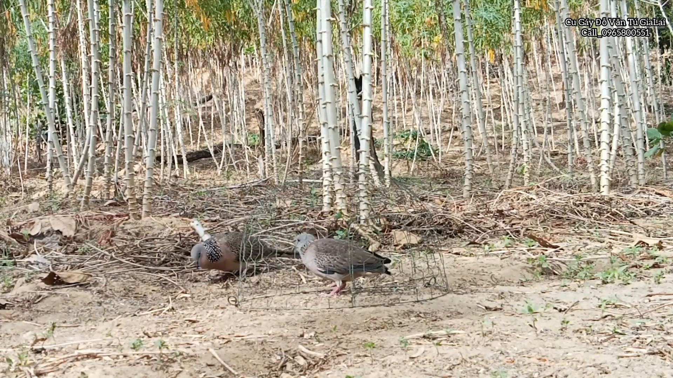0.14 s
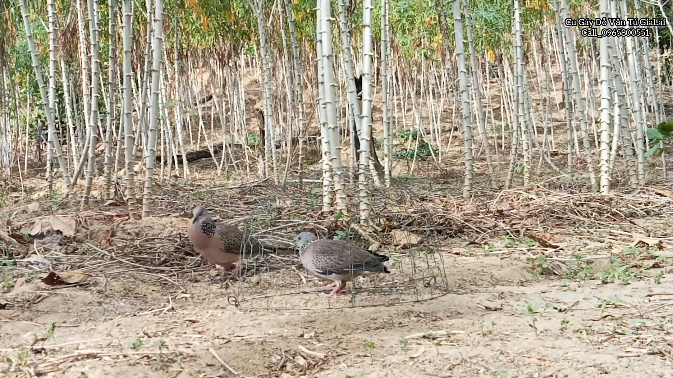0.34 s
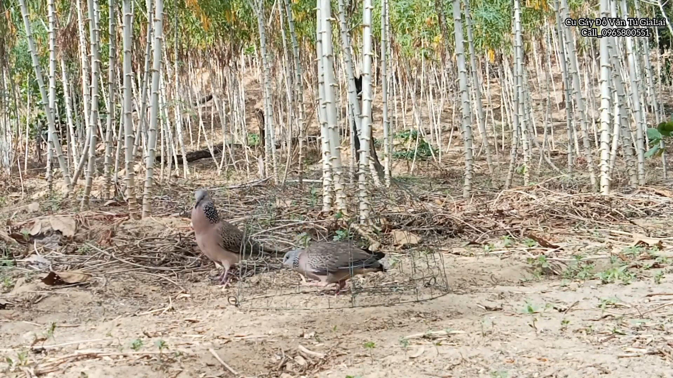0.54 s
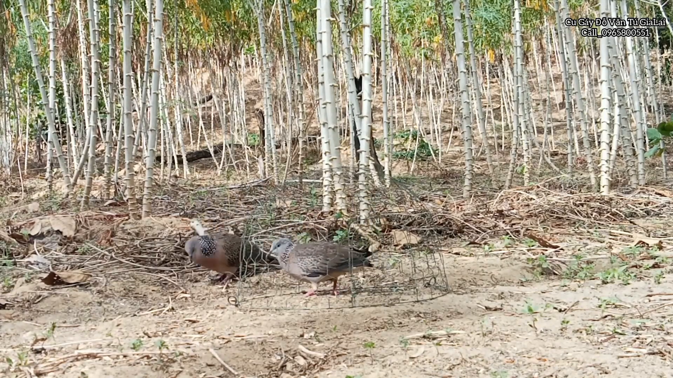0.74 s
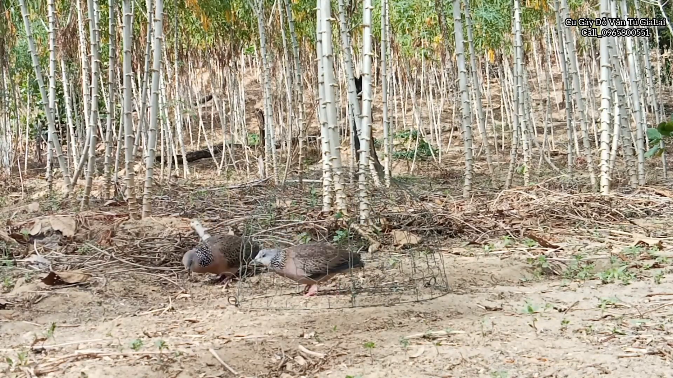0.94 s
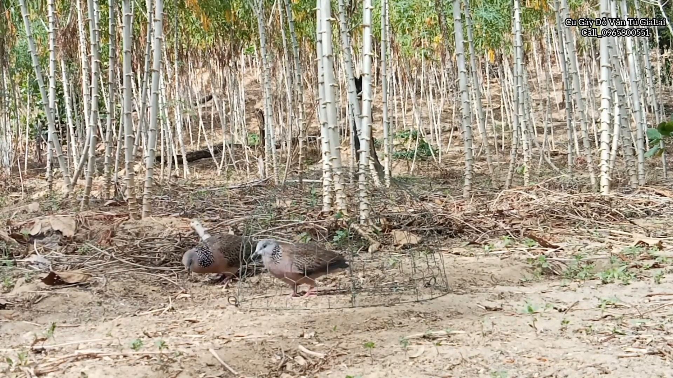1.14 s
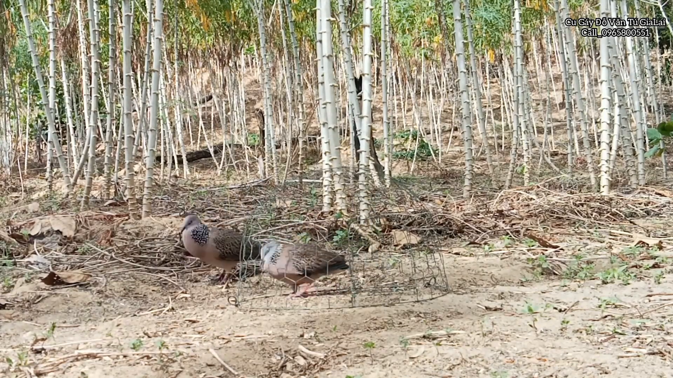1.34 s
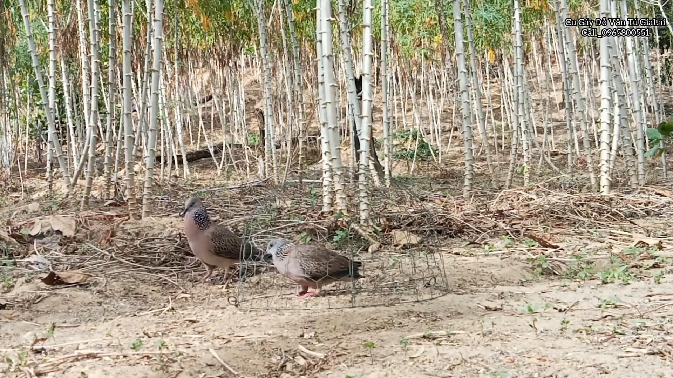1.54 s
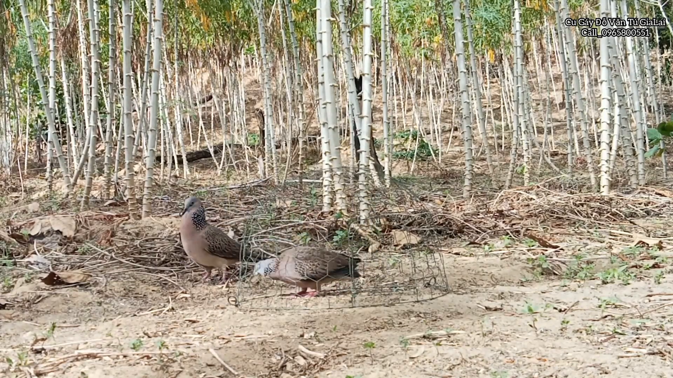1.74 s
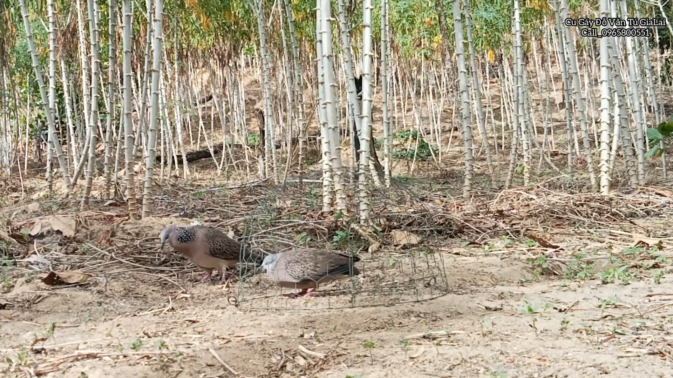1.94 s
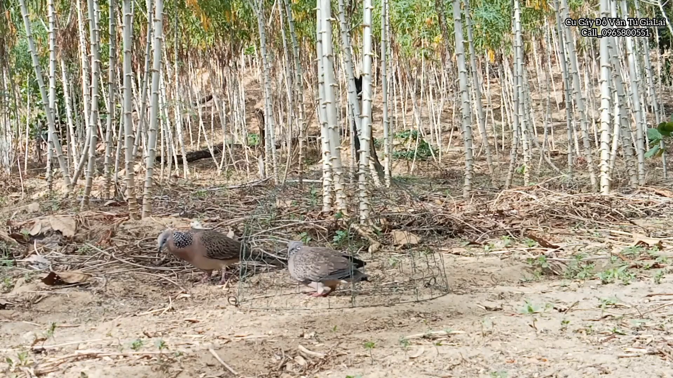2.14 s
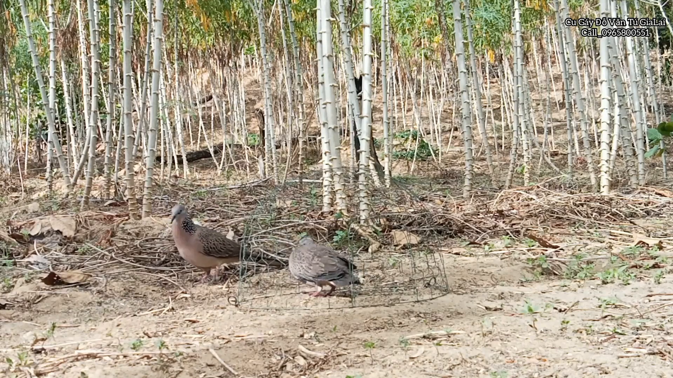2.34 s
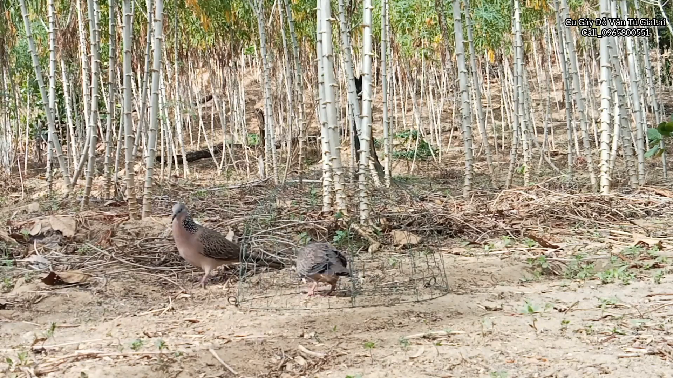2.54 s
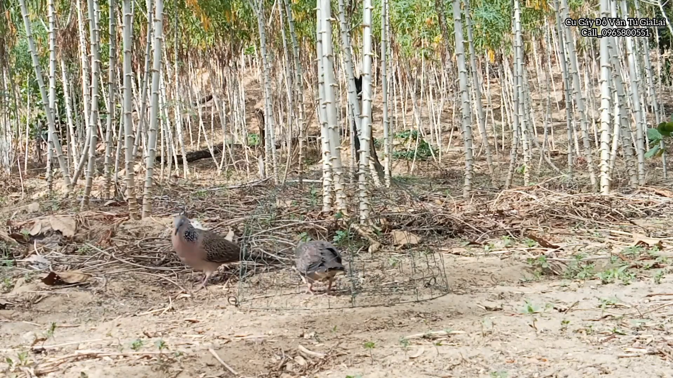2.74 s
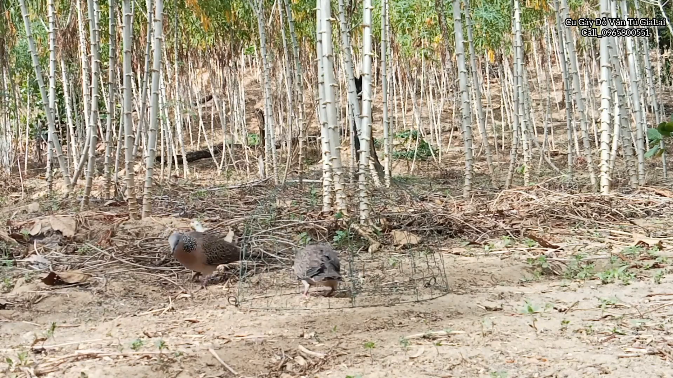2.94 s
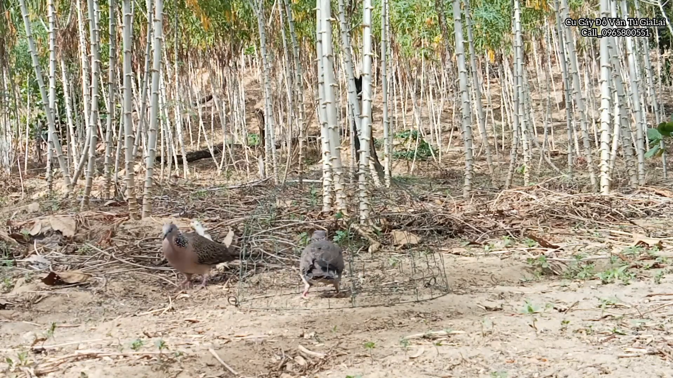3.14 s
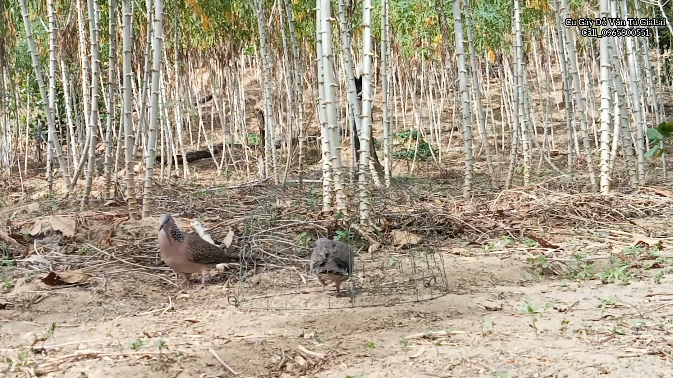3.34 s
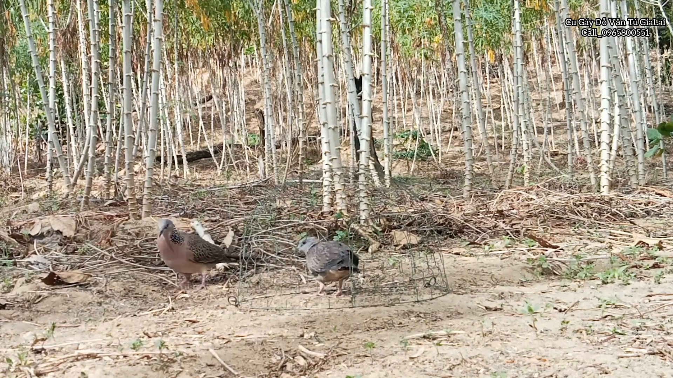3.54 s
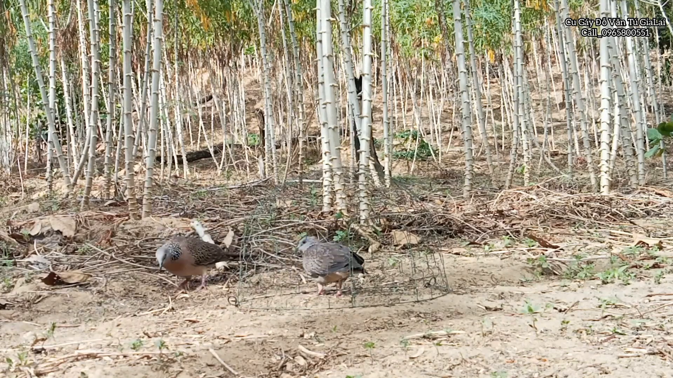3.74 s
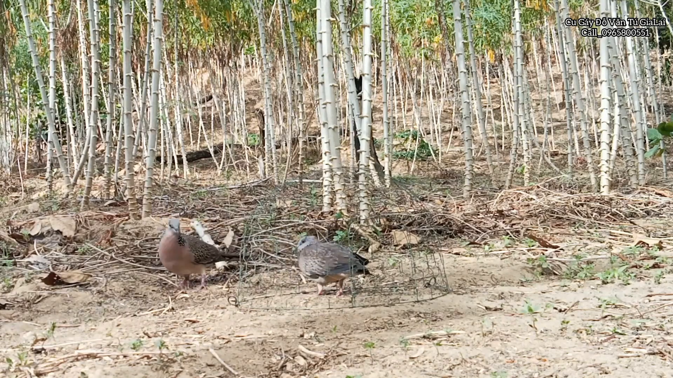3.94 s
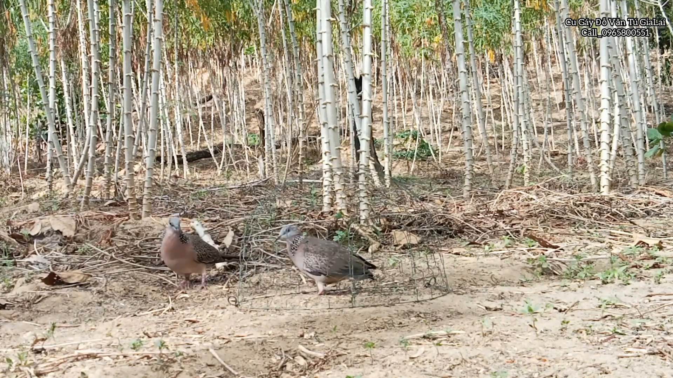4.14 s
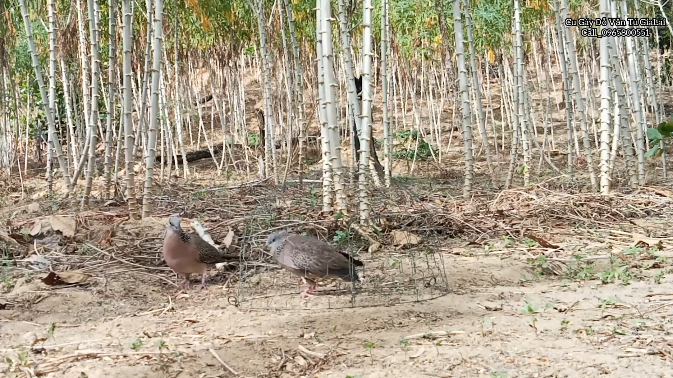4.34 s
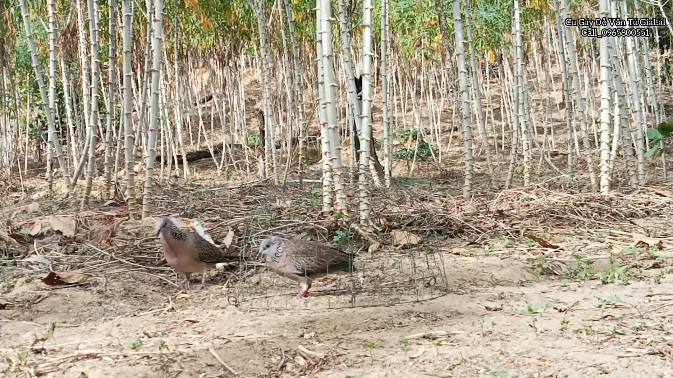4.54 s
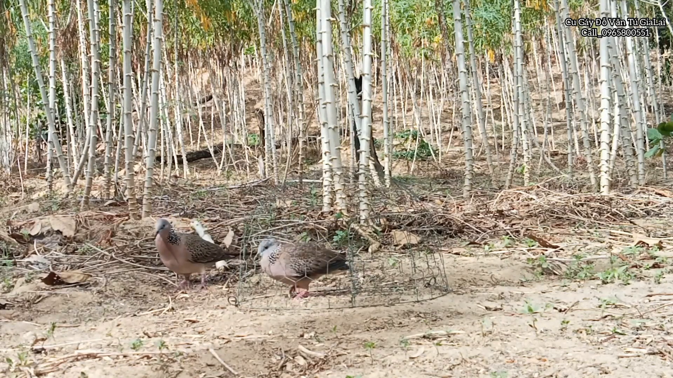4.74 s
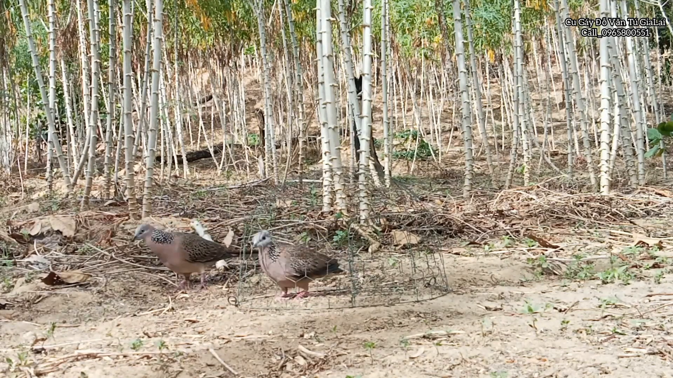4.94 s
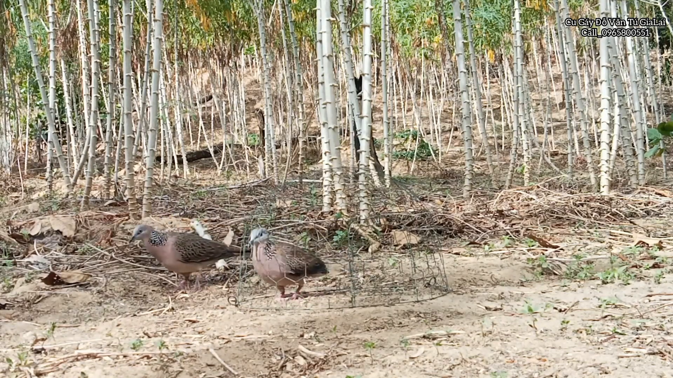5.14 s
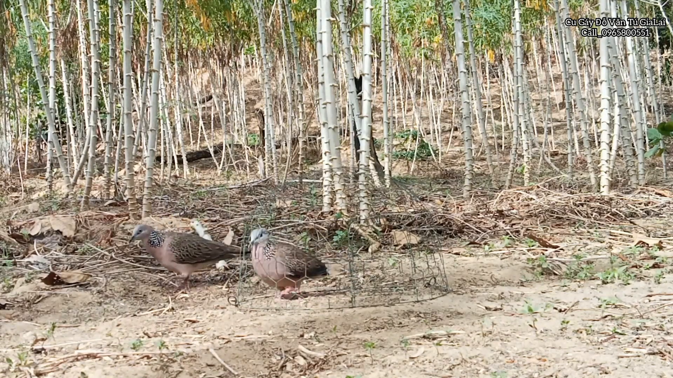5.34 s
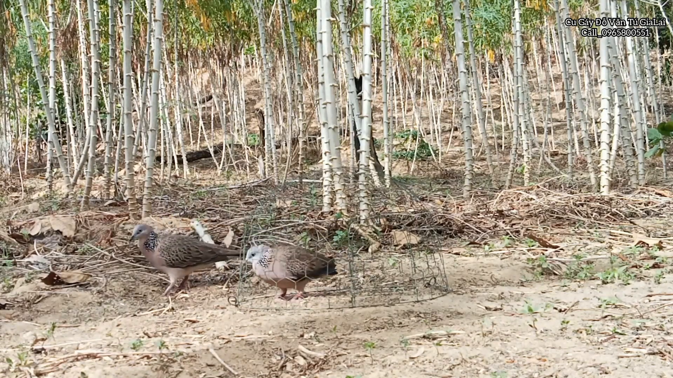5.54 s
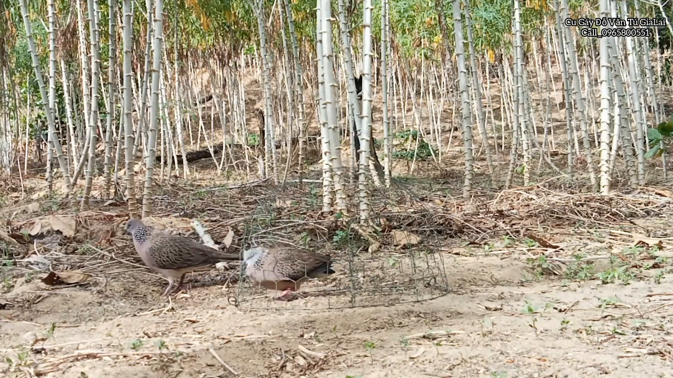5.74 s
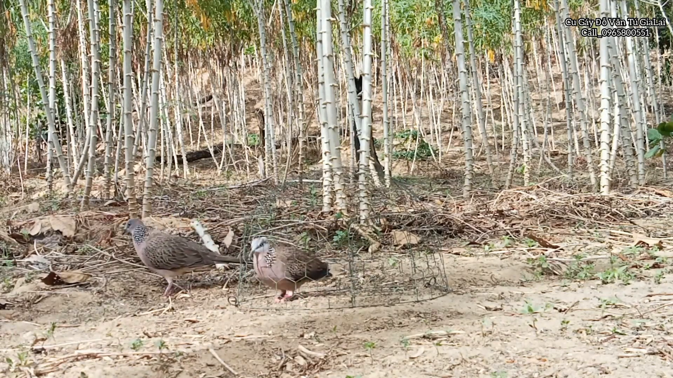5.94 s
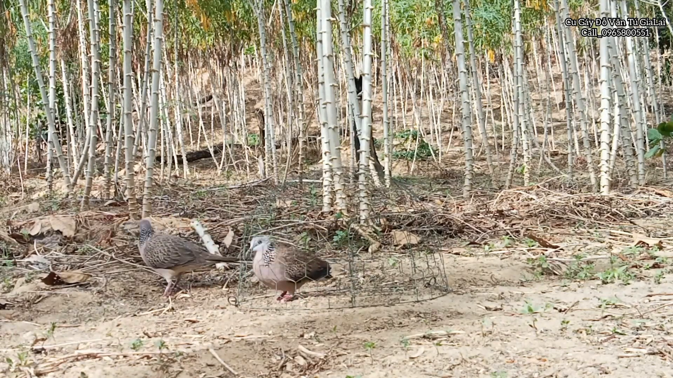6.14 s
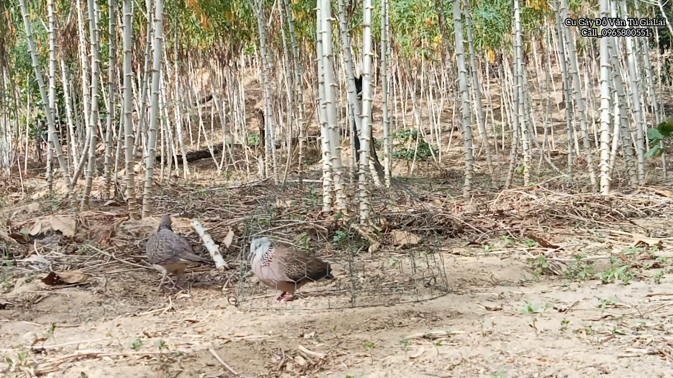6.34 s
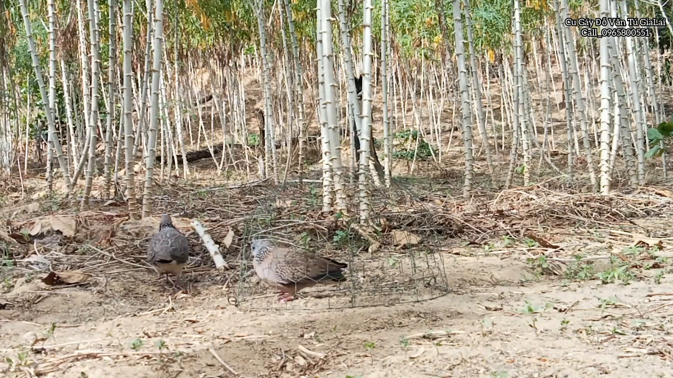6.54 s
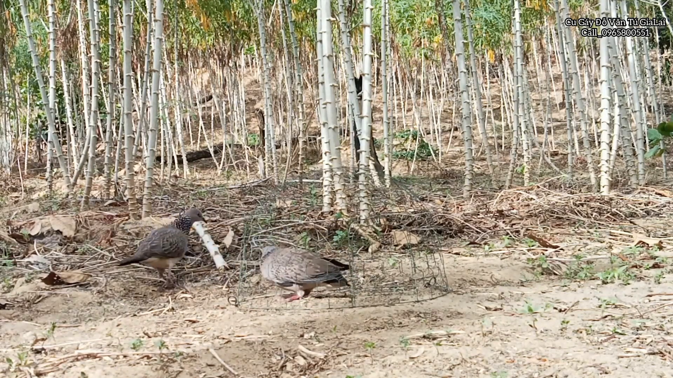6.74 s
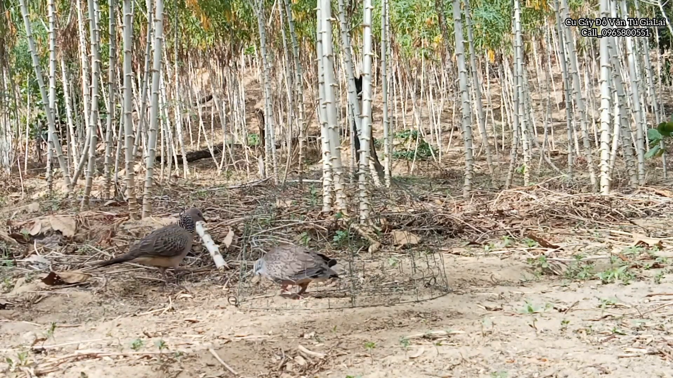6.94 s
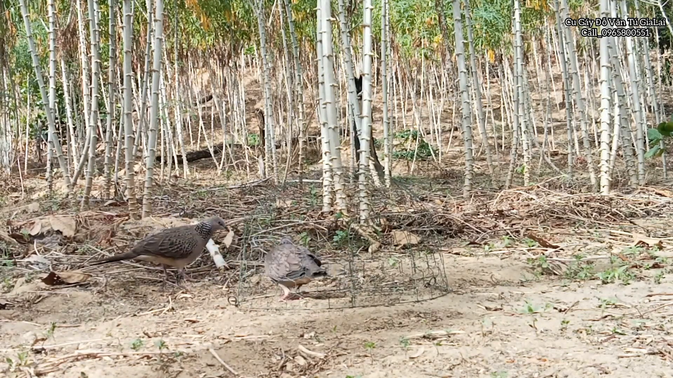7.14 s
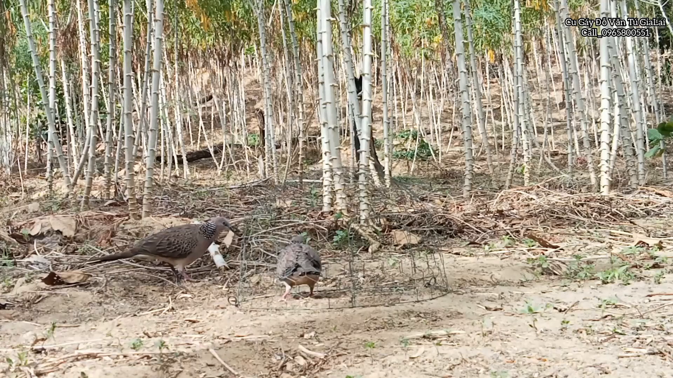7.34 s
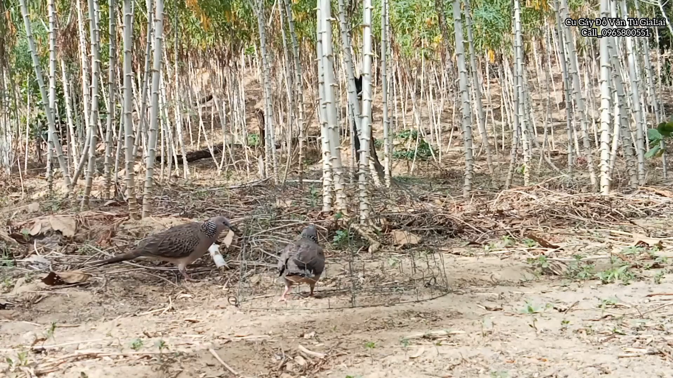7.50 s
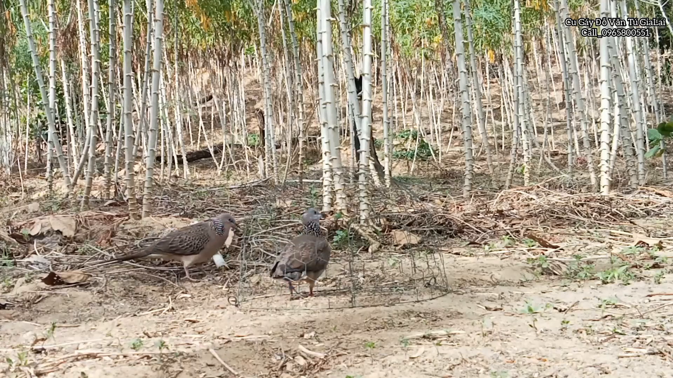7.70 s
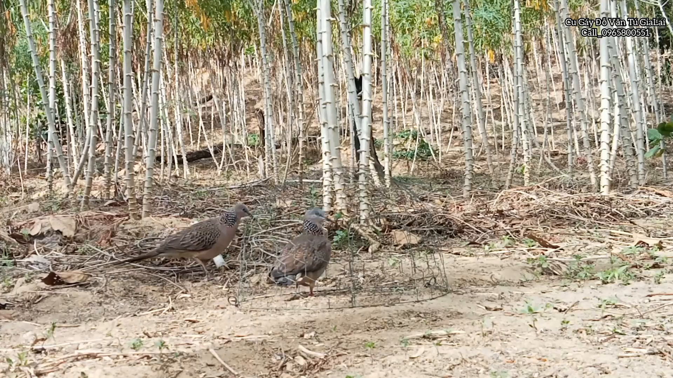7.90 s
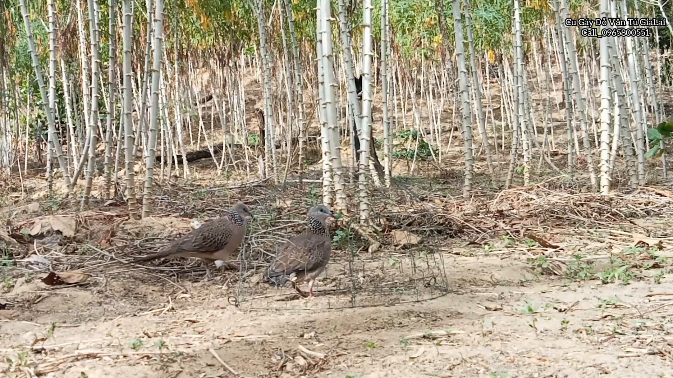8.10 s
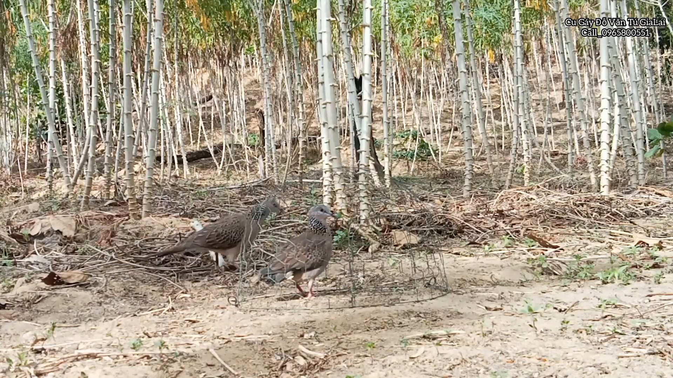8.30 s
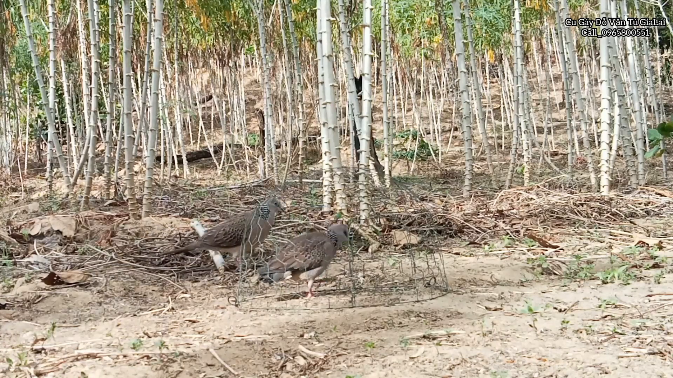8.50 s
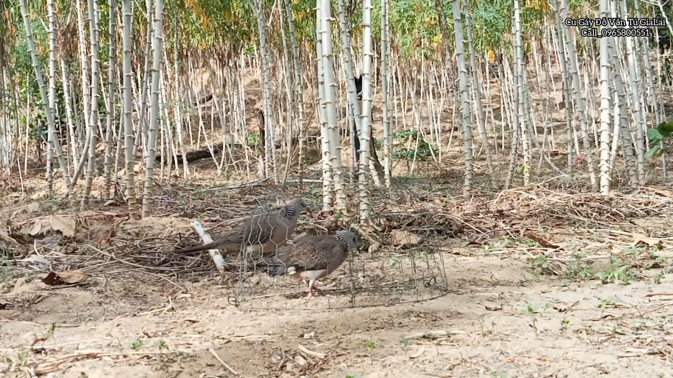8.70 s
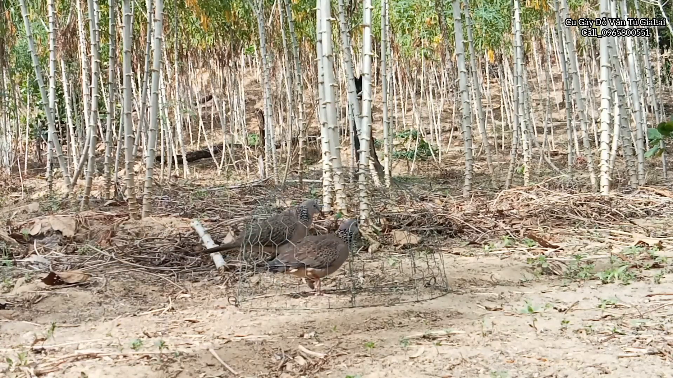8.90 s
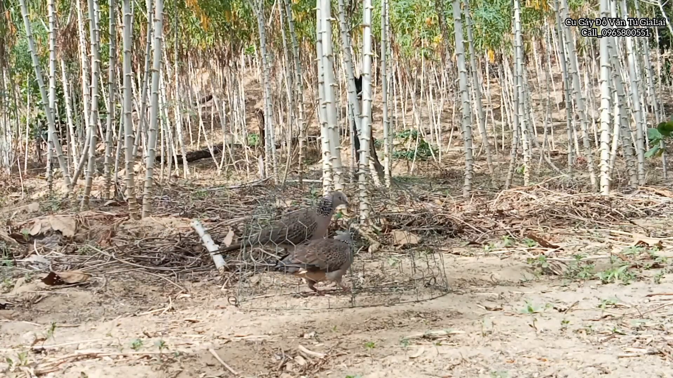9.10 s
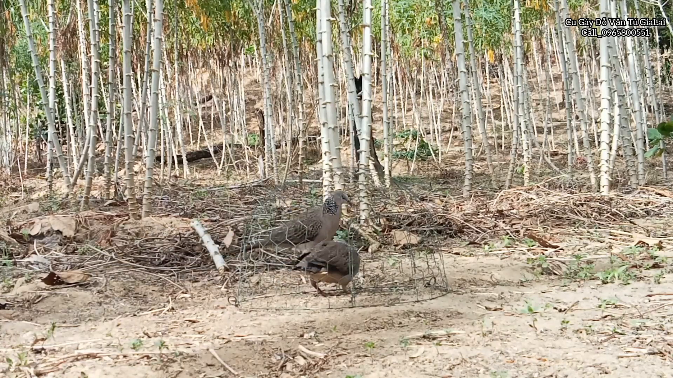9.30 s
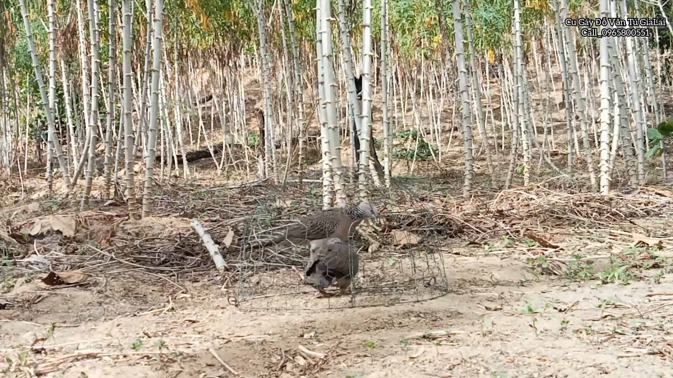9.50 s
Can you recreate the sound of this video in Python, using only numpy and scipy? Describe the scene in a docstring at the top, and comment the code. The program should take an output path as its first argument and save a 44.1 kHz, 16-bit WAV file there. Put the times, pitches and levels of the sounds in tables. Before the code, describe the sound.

A close dove is already cooing at the start: a hollow, nearly pure tone falling from about 790 to 500 Hz until 0.3 s, with small cracks. At 0.68-0.82 s comes a short purring coo, and from 0.93 to 1.32 s a longer one that leaps up, breaks roughly and slides down. Then only quiet background remains. A far one-cylinder engine putters at 23-28 beats per second, quickening until about 3.5 s, dropping away by 5 s and lingering very faintly. A thin cicada buzz runs 0.7-2.7 s. Small birds chatter near 1.7, 3.7 and 5.9 s; faint gliding whistles appear around 3, 4.6, 6.5, 7.5 and 9.3 s, with a tiny high trill at 7.8-8.3 s. Soft leaf rustles dot the scene, notably at 1.3, 3.3 and 8.2 s. Paired-stroke crickets, far insect hiss and soft air gradually fade.

```python
"""A dove coos three times in a grove of thin trunks; far off a one-cylinder engine chugs and draws away.
Small birds whistle and chatter, feet rustle in dry leaves, a cicada buzzes, two crickets chirp in paired
strokes over fading air and far insects. The dove, birds and crickets are gliding or pulsed sines,
the engine is a pulse train ringing in resonances, and cicada, leaves, far insects and air are shaped noise."""
import sys
import numpy as np
from scipy import signal
from scipy.io import wavfile

SR = 44100
rng = np.random.default_rng(int(sys.argv[2]) if len(sys.argv) > 2 else 0)


def to_wav(s):
    """Save 16-bit WAV."""
    ch = np.atleast_2d(s).T  # columns
    pcm = np.round(np.clip(ch, -1, 1) * 32767)  # PCM
    wavfile.write(sys.argv[1], SR, pcm.astype(np.int16))


def elevation(decibels):
    """Turn decibel levels (scalar or array-like) into linear amplitude ratios."""
    levels = np.asarray(decibels, float)
    return 10 ** (levels / 20)


N = 426006
T = np.arange(N) / SR   # seconds

# Three coos of the dove. Each row: time in seconds, pitch in Hz, peak level in dB on a steady pitch.
COO_CURVES = [
    [(0.006, 790, -21.5), (0.062, 736, -20), (0.136, 688.4, -18.5), (0.226, 649, -15),
     (0.256, 618.4, -15.5), (0.276, 587.5, -17), (0.288, 489, -42.5)],
    [(0.68, 617, -30.5), (0.685, 625, -15.5), (0.714, 762, -24), (0.774, 794, -21), (0.811, 670, -18.5),
     (0.813, 570, -25.5), (0.823, 402, -38.5)],
    [(0.925, 434, -52.5), (0.928, 443, -32), (0.946, 585, -14.5), (0.963, 740, -21), (1.054, 771.4, -21),
     (1.134, 716, -19.5), (1.214, 668.4, -17), (1.276, 632.5, -14), (1.321, 570.6, -18), (1.325, 477, -42)],
]
# Slips of the voice, single or in rough quick runs. Each row: time in seconds, share of level lost,
# pitch drop in Hz (negative is a rise), recovery time in ms.
VOICE_SLIPS = [(.0021, .46, 500, 3.2), (0.0117, .3, 150, 5), (0.0233, .95, 231, 3.7),
               (.0374, 0.084, 150.5, 2.8), (0.0453, 0.34, 79.5, 6.1), (0.064, .1, 159.5, 3.9),
               (.088, .2, 274.5, 2.33), (0.1121, 0.022, 210.5, 2.2), (.182, .68, 490, 1.6),
               (0.2604, .88, -130, 2.3), (0.2712, 0.78, 451, 1.03), (.7806, .4, 249.5, 6),
               (0.7883, .5, 500, 1.84), (.802, .64, 430.5, 2.92), (.935, .55, 118.5, 1),
               (.9501, .99, 140, 2), (.961, .47, 80.5, 11), (.9689, .57, 91, 1.5), (.9848, .39, 53.5, 1.8),
               (.9926, 0.4, 500, 1.3), (1.0005, .79, 110, 9), (1.0081, .58, -175, 0.85),
               (1.0145, 0.94, 495, 1.6), (1.0267, .7, 500, 2.16), (1.0388, 0.075, 345, 4.8),
               (1.047, .99, 502, 1.55), (1.0547, .64, 50.5, 21), (1.079, .45, 370.5, 2.7),
               (1.0965, .88, 440, 2.9), (1.111, .04, 275.5, 1.3), (1.2768, .85, 399, 1.75),
               (1.294, .55, -200, 1.94), (1.313, .87, 349, 0.78)]
# Overtones of the dove. Each row: multiple of the pitch, dB against the voice source,
# beak resonance in Hz, its width in Hz.
BEAK_OVERTONES = [(2, -58, 1350, 300), (3, -60, 2200, 120)]
CROP_HZ, CROP_WIDTH_HZ, SLIP_DIP_MS = 594, 130, 2.27
# The purr in the second coo: nine slips, each gap shorter than the last.
PURR_START_S, PURR_FIRST_GAP_MS, PURR_QUICKENS_MS, PURR_JITTER_MS = .6861, 11.9, .42, .22
PURR_SHARE_LOST, PURR_DROP_HZ, PURR_DROP_SPREAD, PURR_RECOVERY_MS = .89, 321.7, .1, 4.2

# Whistled notes. Each row: start in seconds, length in seconds, start pitch in Hz, end pitch in Hz,
# level in dB before a 1.5 dB lift.
WHISTLE_NOTES = [(0.885, .047, 6200, 6210, -74.5), (0.957, 0.055, 5900, 5900, -70.5),
                 (2.839, 0.09, 2740, 3610, -66.5), (3.045, .075, 3850, 5000, -68),
                 (3.105, .075, 4900, 6700, -66), (3.11, 0.071, 1830, 2200, -70),
                 (3.409, .036, 3200, 3820, -66), (4.521, 0.12, 2690, 4000, -71),
                 (4.614, 0.099, 4200, 4400, -63.5), (4.68, 0.04, 4460, 4950, -67),
                 (6.441, .12, 4100, 4570, -69), (6.709, 0.052, 2450, 2570, -69),
                 (7.347, .058, 5920, 4970, -72), (7.43, .125, 2400, 3700, -76.5),
                 (7.522, 0.043, 6780, 5600, -75), (7.55, 0.042, 5670, 5550, -72),
                 (7.773, .03, 3500, 4200, -75), (7.8, 0.084, 4200, 4310, -73),
                 (7.897, .061, 2560, 2610, -75), (8.107, 0.059, 6300, 5030, -70.5),
                 (9.138, .11, 2890, 3690, -75.5), (9.3, .06, 2200, 2110, -80),
                 (9.299, 0.086, 4290, 4300, -81), (9.364, 0.031, 4280, 3690, -72),
                 (9.408, .11, 3620, 3615, -73.5)]
# Chatter of a small bird. Each row: start in seconds, level in dB before the note's envelope.
CHATTER_NOTES = [(.0094, -49), (1.6566, -51), (1.697, -51), (1.7244, -62), (1.7624, -44.5), (1.8033, -45),
                 (3.6994, -60), (3.7394, -56.5), (3.7913, -52), (3.8282, -53.5), (4.2183, -56.5),
                 (5.876, -59), (5.9424, -56), (5.9824, -54), (6.0237, -56), (6.6792, -61)]
# Puffs of leaves under foot. Each row: start in seconds, length in seconds, centre in Hz,
# level in dB of the noise before its swell.
LEAF_PUFFS = [(1.099, .02, 4915, -62.5), (1.325, .07, 4500, -58.5), (1.77, 0.011, 10100, -74),
              (3.339, 0.059, 4470, -64.5), (3.828, 0.0047, 12000, -70), (4.22, .01, 12500, -80),
              (4.878, 0.026, 6050, -73.5), (5.445, 0.037, 4520, -72.5), (6.127, 0.0067, 12000, -78),
              (7.265, .01, 12030, -78), (7.885, 0.039, 3480, -68), (8.238, 0.086, 4980, -73)]

# Cicada level. Each row: time in seconds, level in dB before a 3 dB lift.
CICADA_LEVEL = [(.7, -84.5), (.78, -65), (1.12, -68.5), (1.25, -76), (1.5, -69), (1.68, -70), (1.78, -67.5),
                (2.05, -68), (2.15, -70), (2.7, -87)]
# Tymbal resonances. Each row: centre in Hz, approximate width in Hz, level in dB before the tilt.
TYMBAL_RESONANCES = [(2664, 88, -1.5), (3170, 110, -4.5), (3614, 58, 5)]

# Engine run. Each row: time in seconds, firings per second, level of the main exhaust tone in dB,
# lowest exhaust tone in dB against the main one.
ENGINE_RUN = [(0, 23, -54.5, -5.5), (.9, 24.6, -55.5, -3), (1.6, 25.7, -57, -0.5), (2.55, 27, -55, -6),
              (3.47, 28.2, -57, -5), (4.15, 28.1, -63, -2.5), (4.35, 26.8, -67, 4), (5, 25.2, -73.5, 4.5),
              (5.6, 24, -73, 1), (6.2, 23.1, -69.5, -1), (7.2, 22.7, -75, -1.5), (8.6, 22.7, -75, -1.5),
              (9.66, 22.7, -83.5, 1)]
# Main, upper and lowest exhaust tones. Each row: centre in Hz, approximate width in Hz.
EXHAUST_TONES = [(160, 90), (350, 55), (90, 70)]

# Fade of air, crickets and far insects. Each row: time in seconds, air level in dB.
BACKGROUND_FADE = [(0, -66.5), (.4, -69), (1.6, -68), (3.3, -69), (4.4, -71.5), (5.0, -77), (6.4, -77),
                   (8.3, -78), (9.0, -80), (9.66, -80)]
# Chirp counts of the two crickets. Each row: time in seconds, chirps so far.
LOW_CRICKET_CHIRPS = [(0, -.44), (7.09, 33), (8.6, 39.84), (9.66, 44.82)]
HIGH_CRICKET_CHIRPS = [(0, .12), (9.66, 51.35)]
# Far insect bands. Each row: centre in Hz, width in Hz of each of two resonators in series,
# level in dB against the air, flicker in dB.
FAR_INSECT_BANDS = [(6700, 200, -23, 2), (7270, 550, -9, 3), (7900, 300, -16, 3), (13000, 3000, -18, .7)]
# Colour of the air. Each row: frequency in Hz, relative density in dB per Hz.
AIR_SPECTRUM = [(30, -34), (60, -9), (150, -4), (500, -7), (720, -11.5), (1230, -16), (3020, -18),
                (4000, -17.5), (4950, -28), (6000, -28.5), (8000, -27.5), (9000, -45), (11000, -42),
                (13200, -37), (15400, -46)]


def rms_one(x):
    """Scale to rms 1."""
    return x / np.sqrt(np.mean(x ** 2) + 1e-20)


def in_time(rows):
    """Turn the columns of a table into curves over all samples."""
    s, *columns = np.transpose(rows)
    return [np.interp(T, s, c) for c in columns]


def drift(rate_hz):
    """Random wander of spread 1: noise through two equal low-pass poles, made at SR / 40."""
    r = np.exp(-80 * np.pi * rate_hz / SR)
    noise = rng.standard_normal(N // 40 + 2002)
    slow = signal.lfilter([1], [1, -2 * r, r * r], noise)[2000:]   # skip the settling
    return np.interp(np.arange(N) / 40, np.arange(len(slow)), rms_one(slow))


def resonance(x, hz, width_hz):
    """Ring x in a two-pole resonator with gain about 1 on top."""
    r = np.exp(-np.pi * width_hz / SR)
    zeros = np.array([1, 0, -1]) * (1 - r * r) / 2
    poles = [1, -2 * r * np.cos(2 * np.pi * hz / SR), r * r]
    return signal.lfilter(zeros, poles, x + 1e-18)


def double_resonance(x, hz, width_hz):
    """Two equal resonators in series, at rms 1."""
    return rms_one(resonance(resonance(x, hz, width_hz), hz, width_hz))


def sine(hz):
    """A sine that follows a pitch curve."""
    return np.sin(2 * np.pi * np.cumsum(hz) / SR)


def add(out, s, sound):
    """Mix a short sound in at s seconds."""
    i = round(s * SR)
    out[i:i + len(sound)] += sound[:N - i]


def grove(x, t60):
    """Scatter from the trunks: a dying burst of noise after 12 ms, unit energy, -60 dB at t60 seconds."""
    t = np.arange(SR // 2) / SR
    tail = rng.standard_normal(len(t)) * elevation(-60 * t / t60) * (t > .012)
    return signal.fftconvolve(x, tail / np.sqrt(np.sum(tail ** 2)))[:N]


def all_slips():
    """The tabled slips and the quickening run of the purr, its timing and pitch drops slightly uneven."""
    k = np.arange(9)
    late, off = rng.standard_normal((2, 9))
    ms = k * PURR_FIRST_GAP_MS - k * (k - 1) / 2 * PURR_QUICKENS_MS + PURR_JITTER_MS * late
    drop_hz = PURR_DROP_HZ * (1 + PURR_DROP_SPREAD * off)
    same = np.ones(9)
    purr = np.c_[PURR_START_S + ms / 1e3, PURR_SHARE_LOST * same, drop_hz, PURR_RECOVERY_MS * same]
    return np.r_[VOICE_SLIPS, purr]


def dove():
    """A nearly pure tone through the inflated crop; at slips it dips and its pitch jumps, then glides back."""
    out = np.zeros(N)
    slip_s, lost, drop_hz, recovery_ms = np.split(all_slips(), 4, axis=1)
    flutter_db = .35 * drift(70)   # the level trembles slightly
    for coo in COO_CURVES:
        s, hz, db = np.transpose(coo)
        first = s[0] * (s[0] > .02)   # the first coo is already sounding
        t = np.arange(first, s[-1], 1 / SR)
        steady = np.interp(t, s, hz)
        # the crop lifts pitches near its own, so the drive is divided by that lift
        lift = 1 / np.hypot(1, (steady / CROP_HZ - CROP_HZ / steady) * CROP_HZ / CROP_WIDTH_HZ)
        since_ms = (t - slip_s) * 1000
        dips = 1 - np.clip(lost, 0, 1) * np.exp(-(since_ms / SLIP_DIP_MS) ** 2)
        level = elevation(np.interp(t, s, db) + np.interp(t, T, flutter_db)) * np.prod(dips, axis=0)
        fall = 1 / (1 + np.exp(-np.clip(2 * since_ms, -50, 50)))
        drop = drop_hz * fall * np.exp(-np.maximum(since_ms, 0) / recovery_ms)
        phase = 2 * np.pi * np.cumsum(steady - drop.sum(axis=0)) / SR
        drive = np.r_[level / lift * np.sin(phase), np.zeros(2000)]   # room to ring out
        add(out, first, resonance(drive, CROP_HZ, CROP_WIDTH_HZ))
        for multiple, under_db, beak_hz, width_hz in BEAK_OVERTONES:
            strength = elevation(under_db + 4 * np.interp(t, T, drift(80))) * level / lift ** 2
            add(out, first, resonance(strength * np.sin(multiple * phase), beak_hz, width_hz))
    return out


def whistles():
    """Gliding tones with soft ends, made husky by a fast waver in pitch and level."""
    out, waver = np.zeros(N), drift(250)
    for s, length, start_hz, end_hz, db in WHISTLE_NOTES:
        glide = np.linspace(start_hz, end_hz, int(length * SR))
        glide = glide * (1 + .023 * waver[int(s * SR):][:len(glide)])
        add(out, s, elevation(db + 1.5) * np.hanning(len(glide)) ** .51 * sine(glide))
    return out * elevation(1.6 * drift(90))


def rattle(notes, hz, length, sweep, base_throb_hz, chirp):
    """Falling tones chopped into quick throbs, with pitch and throb rate a little different each note."""
    out, t = np.zeros(N), np.arange(0, length, 1 / SR)
    for (s, db), (pace, off) in zip(notes, rng.random((len(notes), 2))):
        turn = base_throb_hz * (.7 + .51 * pace) * t + .25   # throbs so far
        # the pitch falls over the note and again within each throb
        glide = hz * (1 + .035 * (off - .5) + sweep * (.5 - t / length) + chirp * (.5 - turn % 1))
        throbs = .05 + .95 * np.sin(np.pi * turn) ** 2
        shape = np.minimum(t / .0015, 1) * np.cos(np.pi / 2 * t / length) * throbs
        add(out, s, elevation(db) * shape * sine(glide))
    return out


def chatter():
    """A small bird's short rattling notes."""
    return rattle(CHATTER_NOTES, 3530, .035, .08, 220, .089)


def trill():
    """Nine high notes, loudest at the seventh and 1 dB fainter with each note away from it."""
    notes = [(7.76 + .058 * k, -65 - abs(k - 6)) for k in range(9)]
    return rattle(notes, 7260, .025, .045, 154, .07)


def rustles():
    """Soft puffs of grainy noise a little over an octave wide, and sparse faint random high ticks."""
    out = np.zeros(N)
    for s, length, hz, db in LEAF_PUFFS:
        puff = np.hanning(int(length * SR))
        band = signal.butter(2, [hz / 1.6, min(hz * 1.4, .45 * SR)], "band", fs=SR, output="sos")
        grains = rng.standard_normal(len(puff)) * rng.random(len(puff))
        add(out, s, elevation(db) * puff * rms_one(signal.sosfilt(band, grains)))
    ticks = (rng.random(N) < 14 / SR) * rng.standard_normal(N)   # about 14 a second
    return out + elevation(in_time(BACKGROUND_FADE)[0] + 11) * resonance(ticks, 12500, 4000)


def cicada():
    """Noise rings three tymbal resonances, each flickering; the upper ones sink as the buzz dies."""
    s, db = np.transpose(CICADA_LEVEL)
    tilt_db = -.5 - 3.5 * np.maximum(T - 1.82, 0)   # step from one resonance to the next
    white, buzz = rng.standard_normal(N), 0
    for k, (hz, width_hz, peak_db) in enumerate(TYMBAL_RESONANCES):
        ring = double_resonance(white, hz, 1.5 * width_hz)
        buzz = buzz + elevation(peak_db + k * tilt_db + 2.18 * drift(13)) * ring
    return elevation(np.interp(T, s, db, left=-150, right=-150) + 3 + 1.5 * drift(6.8)) * buzz


def engine():
    """One pulse a firing, uneven in strength, with a rumble between, rings in the exhaust."""
    per_s, db, low_db = in_time(ENGINE_RUN)
    firings = np.cumsum(per_s * (1 + .004 * drift(5))) / SR
    fired = np.diff(np.floor(firings), prepend=0)
    drive = rms_one(fired * elevation(1.8 * drift(15))) + .33 * rng.standard_normal(N)
    drive = drive + .4 * grove(drive, .2)   # scatter on the way blurs the pulses
    hiss = rng.standard_normal(N)   # the higher the tone, the more it is blurred by noise
    main, upper, low = [double_resonance(drive + (hz / 400) ** 2 * hiss, hz, 1.5 * width_hz)
                        for hz, width_hz in EXHAUST_TONES]
    # the upper tone grows against the main one with the firing rate
    upper_db = -8 + .76 * (per_s - 24.5) + 1.4 * drift(2.5)
    return elevation(db) * (main - elevation(upper_db) * upper - elevation(low_db) * low)


def cricket(chirps, hz, db, width):
    """Two strokes a chirp on a slightly wavering tone; width is a share of the chirp period."""
    s, count = np.transpose(chirps)
    pace = np.ptp(count) / np.ptp(s)
    chirp_count = pace * T + np.interp(T, s, count - pace * s)
    away = (chirp_count + .5) % 1 - .5   # share of a chirp period from its middle
    strokes = np.exp(-((away - .07) / width) ** 4) + np.exp(-((away + .145) / width) ** 4)
    return elevation(db + 1.5 * drift(17)) * strokes * sine(hz + 25 * drift(30))


def chorus():
    """Far insects blur into flickering bands of hiss."""
    white, out = rng.standard_normal(N), 0
    for hz, width_hz, db, flicker_db in FAR_INSECT_BANDS:
        out = out + elevation(db + flicker_db * drift(15)) * double_resonance(white, hz, width_hz)
    return out


def air():
    """Far leaves and hum: narrow bands of noise, each flickering a little; rms 1 from 900 to 2000 Hz."""
    out, edges = 0, 30 * 2 ** np.arange(0, 9.3, .25)   # quarter octaves
    white, gust = rng.standard_normal((2, N)), drift(5.8)
    at, db = np.transpose(AIR_SPECTRUM)
    for k, (low, high) in enumerate(zip(edges, edges[1:])):
        sos = signal.butter(2, [low, high], "band", fs=SR, output="sos")
        band = signal.sosfilt(sos, white[k % 2])   # neighbours use separate noises
        band_db = np.interp(np.log(low * high) / 2, np.log(at), db)
        out = out + band * elevation(band_db + 1.1 * drift(6.5) + .5 * gust)
    middle = signal.butter(4, [900, 2000], "band", fs=SR, output="sos")
    return out / np.std(signal.sosfilt(middle, out))


def scene():
    """Near dove nearly dry, far birds wet; air, crickets and far insects share one fade."""
    coos = dove()
    near = coos + elevation(-24.5) * grove(coos, .16) + elevation(-40.5) * grove(coos, 1.0) + rustles()
    whistled = whistles()
    birds = whistled + chatter() + trill()
    echo = elevation(-4) * grove(whistled, .15) + elevation(-7) * grove(birds, .45)
    far = birds + echo + cicada() + engine()
    crickets = cricket(LOW_CRICKET_CHIRPS, 7265, .5, .06) + cricket(HIGH_CRICKET_CHIRPS, 8190, -5, .1)
    insects = crickets + elevation(-9) * grove(crickets, .2) + chorus()
    fade_db, = in_time(BACKGROUND_FADE)
    return (near + far + elevation(fade_db) * (air() + insects))[None]


def low_pass(x):
    """Removes everything above the highest recorded frequency."""
    return signal.sosfilt(signal.butter(12, 15500, fs=SR, output="sos"), x)


def record(dry):
    """Deliver the finished mono mix."""
    return low_pass(dry)


dry = scene()
out = record(dry)
to_wav(out)
```